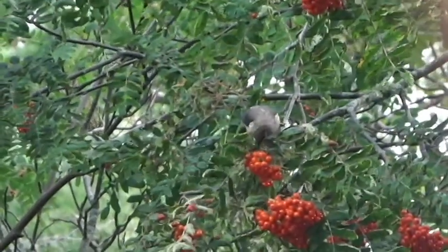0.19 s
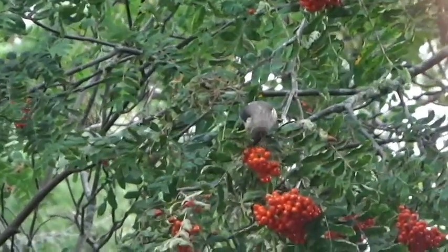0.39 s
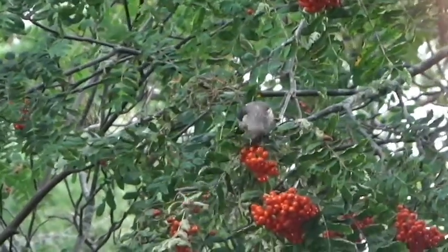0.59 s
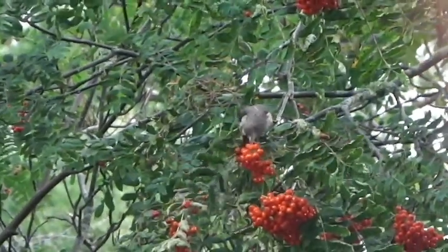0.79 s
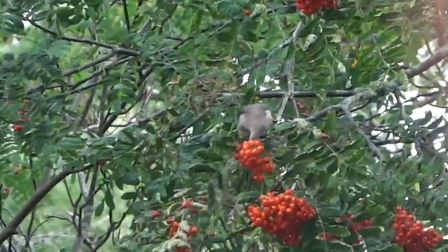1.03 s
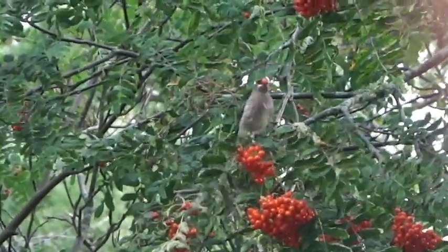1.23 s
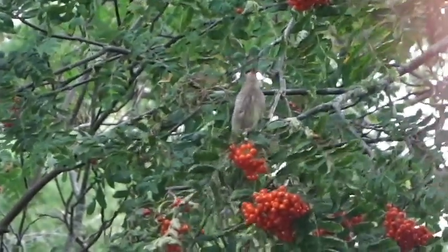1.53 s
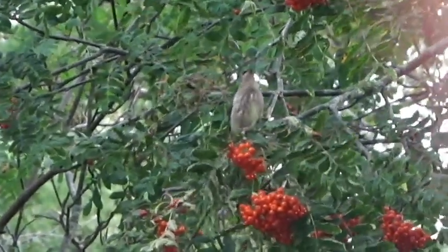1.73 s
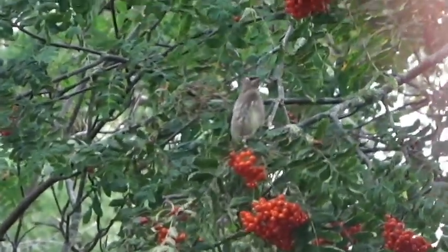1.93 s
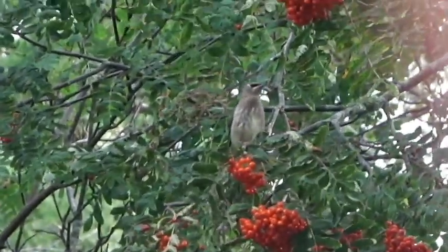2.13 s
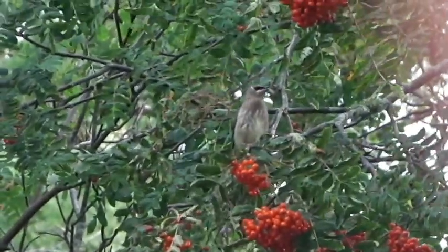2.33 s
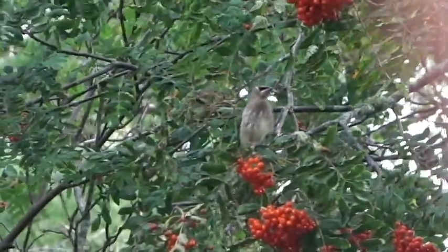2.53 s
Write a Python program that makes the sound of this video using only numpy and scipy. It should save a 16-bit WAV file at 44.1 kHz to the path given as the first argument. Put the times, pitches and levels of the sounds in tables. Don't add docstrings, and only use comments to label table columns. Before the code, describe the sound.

High-pitched raspy bird trills outdoors, two short lower chirps, one sharp click and faint haze

```python
import sys
import numpy as np
from scipy import signal
from scipy.io import wavfile
from scipy.ndimage import uniform_filter1d

SR = 44100
rng = np.random.default_rng(int(sys.argv[2]) if len(sys.argv) > 2 else 0)


def waveform_to_disk(signal):
    frames = np.transpose(np.atleast_2d(signal))
    scaled = np.clip(frames, -1, 1) * 32767
    samples = np.round(scaled).astype(np.int16)
    wavfile.write(sys.argv[1], SR, samples)


def voltage_ratio(decibels):
    exponent = np.asarray(decibels, float) / 20
    return 10 ** exponent


N = 119070


def read(points, hz):
    f, value = np.transpose(points)
    return np.interp(np.log(hz + 1), np.log(f + 1), value)


def evened(x):
    return x / np.sqrt(np.mean(x ** 2) + 1e-20)


def smooth_twice(x, size):
    return uniform_filter1d(uniform_filter1d(x, size=size), size=size)


def flutter(count):
    return evened(smooth_twice(rng.standard_normal(count), 45))


def add(mix, start_s, sound):
    part = mix[..., round(start_s * SR):][..., :sound.shape[-1]]
    part += sound[..., :part.shape[-1]]


def sides(pan_db):
    return voltage_ratio(np.array([[pan_db / 2], [-pan_db / 2]]))


def phase(pitch_hz):
    return 2 * np.pi * np.cumsum(pitch_hz) / SR


def scatter(x, t60):
    taps = np.zeros((2, 30000))
    at = np.arange(40, 29960, 20) + rng.integers(0, 20, (2, 1496))
    np.put_along_axis(taps, at, rng.choice([-1., 1.], at.shape), 1)
    taps *= voltage_ratio(-60 * np.arange(30000) / SR / t60)
    return signal.fftconvolve(x, taps / np.linalg.norm(taps[0]), axes=1)[:, :N]


def trill(start_s, length_s, level_db, pitch_hz, sag_hz,
          rate, swing_hz, gap_db, uneven_db, octave_db, pan_db, lead):
    t = np.arange(0, length_s, 1 / SR)
    u = t / length_s
    late, off_pitch, uneven = rng.standard_normal((3, 40))
    notes = t * rate
    notes = notes + .12 * np.interp(notes, np.arange(40), late)
    place, k = notes % 1, np.clip(notes, 0, 39).astype(int)
    arch = np.sin(np.pi * place ** .8) ** 1.7
    slide = (.65 + .7 * u) * (arch - 1)
    rasp_hz = 300 * (0.1 + u) * np.tanh(flutter(len(t))) * swing_hz / 780
    pitch = pitch_hz - sag_hz * u + swing_hz * slide + 80 * off_pitch[k] + rasp_hz
    turn = phase(pitch) + np.array([[lead], [0]])
    gaps = gap_db * (1 - .8 * u) * (arch - 1)
    bend = np.log(.5) / np.log(.45)
    swell = np.sin(np.pi * u ** bend) ** .28
    swell = swell * voltage_ratio(gaps + uneven_db * uneven[k] + 3 * flutter(len(t)))
    tone = np.sin(turn) + voltage_ratio(octave_db) * np.sin(2 * turn)
    return voltage_ratio(level_db - 0.5) * sides(pan_db) * swell * tone


# start_s, length_s, level_db, pitch_hz, sag_hz
HIGH_CALLS = [(.055, .195, -57, 8500, -150), (.3, .17, -59, 8400, -150), (.55, .165, -57.5, 8350, -150),
              (.8, .125, -56, 8450, 150), (.953, .075, -52.5, 6980, 100), (1.238, .29, -57, 8550, 0),
              (1.555, .2, -57, 8400, -200), (1.825, .21, -54, 8400, -200), (2.082, .015, -61, 9000, 0),
              (2.125, .2, -56.5, 8650, 450), (2.42, .06, -61, 8150, 0)]
# start_s, length_s, level_db, pitch_hz, sag_hz
LOW_CALLS = [
    (.37, .12, -62, 7750, 300),
    (.53, .25, -53, 7300, 150),
    (1.635, .07, -61, 7500, 0),
    (1.7, .125, -56, 7500, 0),
    (1.96, .23, -50, 7250, 300),
    (2.19, .11, -54, 7800, 250),
    (2.285, .17, -50, 7050, 100),
    (2.46, .06, -61, 7700, 300),
]
# notes_per_s, swing_hz, gap_depth_db, unevenness_db, octave_db,
# left_right_db, left_lead_rad
BUZZ_STYLE = (105, 520, 4, 2.5, -60, -3.5, 1.5)
TRILL_STYLE = (34.5, 780, 9, 2.5, -24, -1.5, 1.25)


def trills():
    out = np.zeros((2, N))
    for calls, style in ((HIGH_CALLS, BUZZ_STYLE), (LOW_CALLS, TRILL_STYLE)):
        for call in calls:
            add(out, call[0], trill(*call, *style))
    return out


def note(length_s, level_db, top_hz):
    u = np.arange(0, 1, 1 / SR / length_s)
    pitch_rasp, level_rasp = flutter(3000)[:len(u)], flutter(3000)[:len(u)]
    climb, dive = np.maximum(1 - u / .5, 0), np.maximum((u - .5) / .5, 0)
    pitch = top_hz - 350 * climb ** 2 - 1150 * dive ** 2 + 80 * pitch_rasp
    turn = phase(pitch) + np.array([[1.25], [0]])
    swell = np.sin(np.pi * u) ** .7 * voltage_ratio(level_db + 1.5 - 6 * dive + 1.5 * level_rasp)
    return sides(-1.5) * swell * (np.sin(turn) + voltage_ratio(-27) * np.sin(2 * turn))


# start_s, length_s, level_db, top_hz
CLEAR_NOTES = [(0.505, 0.021, -49, 7350), (0.534, 0.032, -50, 7430), (0.56, 0.043, -44, 7550),
               (0.594, .03, -50, 7150), (0.613, 0.048, -45, 7650), (.645, 0.035, -48, 7050),
               (0.67, 0.036, -46, 7400), (.705, .028, -51, 7020), (.73, 0.014, -56, 7300),
               (0.918, 0.024, -51, 7130), (.935, 0.023, -51, 7300), (1.731, 0.032, -50.5, 7500),
               (1.923, 0.029, -46.5, 7500), (1.956, 0.026, -41, 7350), (1.986, 0.019, -41, 7600),
               (2.005, .015, -46, 7600), (2.016, 0.024, -40.5, 7330), (2.043, 0.025, -41, 7670),
               (2.065, .015, -47, 7570), (2.074, 0.022, -47, 7280), (2.099, .022, -40.5, 7570),
               (2.128, 0.024, -50, 6900), (2.15, 0.02, -43.5, 7480), (2.181, 0.012, -48, 7300),
               (2.197, 0.024, -48, 7600), (2.243, 0.022, -49, 7650), (2.28, 0.018, -45, 7550),
               (2.295, 0.034, -43.5, 7200), (2.318, 0.033, -44, 7350), (2.363, 0.021, -44, 7170),
               (2.385, .026, -42, 7250), (2.413, 0.037, -46, 7000), (2.455, 0.04, -55, 7020),
               (2.126, 0.017, -45.5, 8530), (2.153, 0.022, -43, 8340), (2.177, .02, -47, 8600),
               (2.204, 0.0183, -43, 8260), (2.228, 0.013, -43, 8300), (2.252, 0.0256, -48, 8100),
               (2.3, .02, -51, 8100), (2.393, .016, -55, 8100), (2.447, 0.012, -59, 8100),
               (1.909, .02, -49, 8600), (1.959, 0.016, -45, 8500), (2.007, .018, -46.5, 8440)]


def clear_notes():
    out = np.zeros((2, N))
    for start_s, *row in CLEAR_NOTES:
        add(out, start_s, note(*row))
    return out


def waxwings():
    blurred, near = trills(), clear_notes()
    to_leaves = blurred + near / voltage_ratio(3)
    leaves = voltage_ratio(1) * scatter(to_leaves, .11)
    far_trees = voltage_ratio(-11) * scatter(to_leaves, .35)
    return blurred + near + leaves + far_trees


def chirp_phase(start_s, length_s, top_hz, droop, place, shape):
    u = np.arange(0, 1, 1 / SR / length_s)
    return phase(top_hz * (1 - droop * abs((u - place) / .5) ** shape))


# start_s, length_s, top_hz, droop_share, top_place_0_to_1
LOWER_VOICE = [
    (1.029, .071, 1550, .42, .5),
    (1.306, .071, 1665, .33, .5),
]
UPPER_VOICE = [
    (1.031, .069, 1950, .3, .5),
    (1.306, .071, 2770, .37, .53),
]
# lower_db, upper_db, lower_octave_db, sum_tone_db, left_right_db
CHIRP_PARTS = [(-48, -64, -54, -80, -6), (-47, -46, -54, -64, -9)]
LATE_OCTAVE = [-1, -14]


def chirps():
    out = np.zeros((2, N))
    for lower, upper, parts, late_db in zip(LOWER_VOICE, UPPER_VOICE, CHIRP_PARTS, LATE_OCTAVE):
        lower_db, upper_db, octave_db, sum_db, pan_db = parts
        a, b = chirp_phase(*lower, 1.9), chirp_phase(*upper, 1.45)
        n = min(len(a), len(b))
        a, b, u = a[:n], b[:n], np.arange(n) / n
        tone = voltage_ratio(lower_db) * np.sin(a) + voltage_ratio(upper_db) * np.sin(b) + voltage_ratio(sum_db) * np.sin(a + b)
        octave = voltage_ratio(octave_db + late_db * (u > .5)) * np.sin(2 * a)
        tone = tone + octave * abs(np.cos(np.pi * u))
        add(out, lower[0], 1.4 * sides(pan_db) * tone * np.sin(np.pi * u) ** .8)
    yard = voltage_ratio(-2) * scatter(uniform_filter1d(out, size=12), 1.1)
    wall = voltage_ratio(-11) * scatter(out, .1)
    return out + yard + wall


# start_s, length_s, level_db, pitch_hz
PEEPS = [
    (.005, .025, -61, 1550),
    (.115, .028, -62, 1910),
    (.285, .028, -59, 1970),
    (.375, .055, -62, 1460),
    (.435, .035, -62, 1990),
    (.495, .03, -62, 1490),
    (1.39, .075, -60, 1640),
    (1.475, .035, -56, 1660),
    (1.36, .032, -56, 1620),
]


def peeps():
    out = np.zeros((2, N))
    for start_s, length_s, level_db, pitch_hz in PEEPS:
        t = np.arange(0, length_s, 1 / SR)
        tone = np.sin(np.pi * t / length_s) * np.sin(2 * np.pi * pitch_hz * t)
        add(out, start_s, voltage_ratio(level_db) * sides(-5) * tone)
    return out


def unbassed(x):
    return signal.sosfilt(signal.butter(4, 230, "high", fs=SR, output="sos"), x)


# pitch_hz, left_db, right_db, t60_s (time to fade 60 dB)
CASING_RINGS = [(490, -29.5, -19, 0.016), (615, -22, -15, 0.013), (810, -9.5, -9.5, 0.011),
                (1230, -15.5, -36, 0.011), (1900, -10, -18, 0.0082), (3330, -15, -42, 0.0087),
                (4070, -19.5, -14.5, 0.0044), (4860, -38, -20, 0.0072), (6100, -24, -22.5, 0.0053),
                (7900, -17, -46, 0.012), (8600, -20, -29, 0.0085), (9500, -22.5, -24.5, 0.0032),
                (12800, -26.5, -46, 0.0037)]
# delay_s, level_db
TICKS_OF_SNAP = [
    (0, -9),
    (.0002, 0),
    (.00051, -7),
]


def snap():
    out, ring, t = np.zeros((2, N)), 0, np.arange(2000) / SR
    for pitch_hz, left_db, right_db, t60 in CASING_RINGS:
        fade = voltage_ratio(np.array([[left_db], [right_db]]) - 60 * t / t60)
        lag = np.array([[0], [np.pi if pitch_hz < 1500 else 1.6]])
        onset = 1 - np.exp(-(t * pitch_hz ** 1.5 / 17) ** 2)
        ring = ring + fade * np.sin(2 * np.pi * pitch_hz * t - lag) * onset
    for delay_s, level_db in TICKS_OF_SNAP:
        add(out, .9516 + delay_s, voltage_ratio(level_db) * ring)
    out = signal.oaconvolve(out, signal.firwin(127, 16500, fs=SR)[None], "same")
    return unbassed(out + voltage_ratio(-23) * scatter(smooth_twice(out, 3), .1))


def knock(pitch_hz):
    t = np.arange(3000) / SR
    ring = np.sin(2 * np.pi * pitch_hz * t) + 0.25 * np.sin(2 * np.pi * 1.56 * pitch_hz * t)
    return voltage_ratio(-60 * t / 0.031) * (1 - np.exp(-t / 0.0058)) * ring


# start_s, peak_db, pitch_hz
FINGER_KNOCKS = [(0.264, -36, 424), (0.333, -32.5, 460), (0.532, -32.5, 433), (0.566, -31.5, 416),
                 (0.609, -35, 430), (0.668, -37, 470), (0.766, -33, 482), (0.831, -38.5, 464),
                 (1.001, -23, 431), (1.011, -35, 428), (1.169, -31, 423), (1.7, -56, 350),
                 (1.701, -25.5, 412), (2.526, -38, 396)]
# time_s, level_db
PATTER_LEVEL = [(0, -46), (.5, -51.5), (.9, -62), (1.5, -59), (2.7, -72)]


def knocks():
    body = np.zeros(N)
    for start_s, peak_db, pitch_hz in FINGER_KNOCKS:
        add(body, start_s, voltage_ratio(peak_db + 3.5) * knock(pitch_hz))
    level = voltage_ratio(np.interp(np.arange(N) / SR, *np.transpose(PATTER_LEVEL)))
    for pitch_hz in (375, 410, 457, 570):
        struck = rng.random(N) < 70 / 4 / SR
        taps = struck * rng.standard_normal(N) * level * 4
        body = body + signal.oaconvolve(taps, knock(pitch_hz))[:N]
    return unbassed(body) * np.array([[-voltage_ratio(-6.5)], [1.6]])


# start_s, peak_db, pitch_hz
HAND_THUMPS = [(0.096, -53.5, 97), (0.154, -57, 90), (0.214, -47, 78), (.272, -49, 85), (0.29, -42.5, 111),
               (0.321, -46, 73), (0.389, -52, 90), (0.481, -60, 84.5), (0.531, -62, 69.4), (0.651, -48, 77),
               (0.815, -62, 71.6), (0.935, -49.5, 84), (1.184, -49.5, 74), (1.218, -48, 93),
               (1.693, -55.5, 87.5), (1.884, -50, 95), (2.131, -50.5, 125), (2.205, -46.5, 84),
               (2.222, -49.5, 121), (2.242, -49, 83.5), (2.33, -61, 81), (2.678, -56.5, 122)]


def thumps():
    low, cycles = np.zeros(N), 2.5
    for start_s, peak_db, pitch_hz in HAND_THUMPS:
        u = np.arange(0, 1, pitch_hz / cycles / SR)
        upper = .3 * np.sin(4.1 * np.pi * cycles * u ** 1.12)
        swing = np.sin(2 * np.pi * cycles * u) + upper
        add(low, start_s, -voltage_ratio(peak_db) * np.sin(np.pi * u) ** 2 * swing)
    return low * sides(0)


# start_s, level_db, dullness_samples
TWIG_TICKS = [
    (.279, -56, 2),
    (1.039, -53, 2),
    (1.44, -58, 2),
    (2.062, -40, 5),
]


def twigs():
    out, t = np.zeros((2, N)), np.arange(300) / SR
    for start_s, level_db, dull in TWIG_TICKS:
        puff = uniform_filter1d(rng.standard_normal((2, 300)), size=dull)
        add(out, start_s, voltage_ratio(level_db + 6 - 60 * t / .012) * puff)
    return out


# pitch_hz, likeness_0_to_1
LIKENESS = [(100, 0.55), (300, 0.044), (1000, 0.6), (2500, 0.061), (8000, 0.26), (15000, 0.1)]
# pitch_hz, left_right_db
LEFT_LEAN = [(60, 11), (180, 1), (550, -5), (1650, -3.5), (4970, -2.5), (15000, 2)]
# pitch_hz, lead_rad
LEFT_LEAD = [(0, -0.5), (1000, 0), (2100, 2), (8000, 1.5), (12000, 4.5), (16000, -1)]


def air(spectrum, level_db, patchy_db, flicker_db):
    frames, hz = N // 256 + 5, np.fft.rfftfreq(1024, 1 / SR)
    a, b, c, d, chance = rng.standard_normal((5, 513, frames))
    flicker = evened(uniform_filter1d(chance[0], size=4))
    patches = uniform_filter1d(chance, size=10, axis=0)
    patches = evened(uniform_filter1d(patches, size=10, axis=1))
    same = np.clip(read(LIKENESS, hz), -1, 1)[:, None]
    left = a + 1j * b
    right = same * left + np.sqrt(1 - same ** 2) * (c + 1j * d)
    z = np.array([left, right * np.exp(-1j * read(LEFT_LEAD, hz))[:, None]])
    z *= voltage_ratio(read(spectrum, hz)[:, None] + patchy_db * patches + flicker_db * flicker)
    z *= voltage_ratio(np.array([.5, -.5])[:, None, None] * read(LEFT_LEAN, hz)[:, None])
    return voltage_ratio(level_db) * evened(signal.istft(z, nperseg=1024, noverlap=768)[1][:, :N])


# pitch_hz, level_db (per Hz)
HAZE_TONE = [(220, -19), (412, 0), (600, -6.5), (2030, -13.5), (8900, -16), (10000, -23), (14800, -26.5),
             (15900, -59)]
# pitch_hz, level_db (per Hz)
RUMBLE_TONE = [(12, -34), (20, -6.5), (97, 10), (131, 11), (205, -5.5), (260, -33.5), (340, -61),
               (570, -120)]
# time_s, level_db
HAZE_SWELL = [(0, 1), (.4, 1), (1, 1), (1.601, 0.5), (2.7, 0.2)]


def haze():
    swell = voltage_ratio(np.interp(np.arange(N) / SR, *np.transpose(HAZE_SWELL)))
    return swell * air(HAZE_TONE, -52.5, .8, .5) + air(RUMBLE_TONE, -68, 2, 2)


def scene():
    steady = waxwings() + peeps() + twigs() + haze()
    steady = signal.oaconvolve(steady, signal.firwin(255, 15750, fs=SR)[None], "same")
    return steady + chirps() + snap() + knocks() + thumps()


def band_limit(x):
    return signal.sosfilt(signal.butter(12, 16660, fs=SR, output="sos"), x)


def record(dry):
    return band_limit(dry)


dry = scene()
out = record(dry)
waveform_to_disk(out)
```